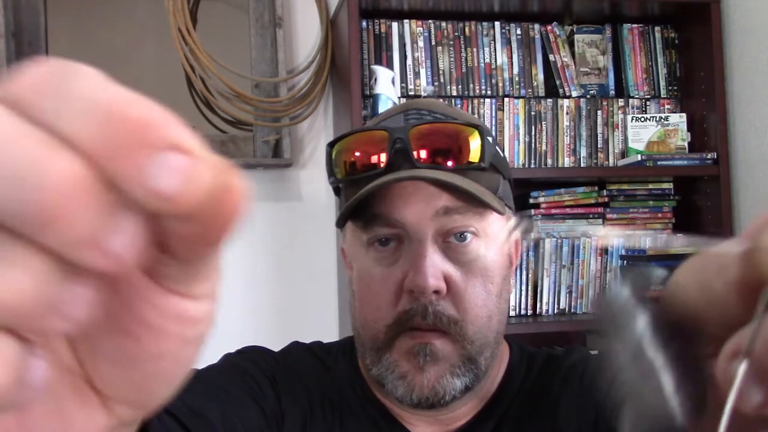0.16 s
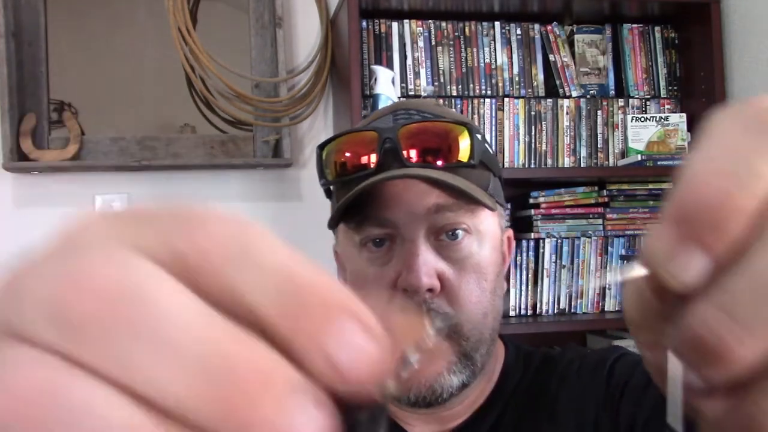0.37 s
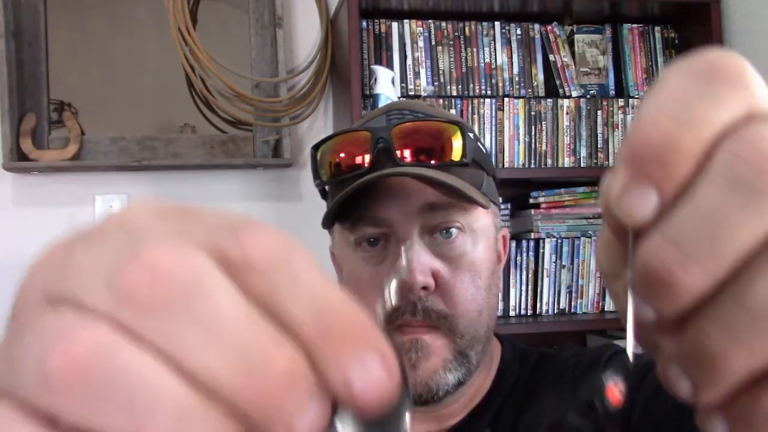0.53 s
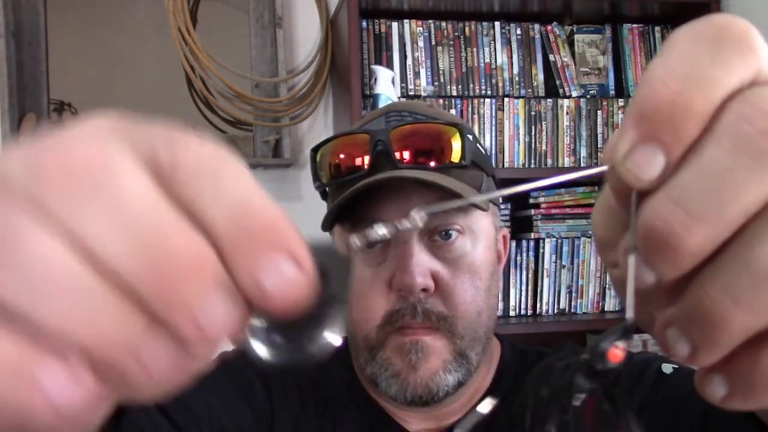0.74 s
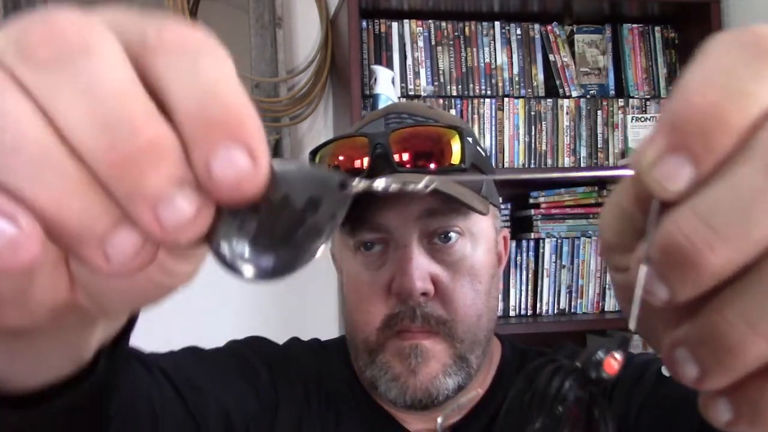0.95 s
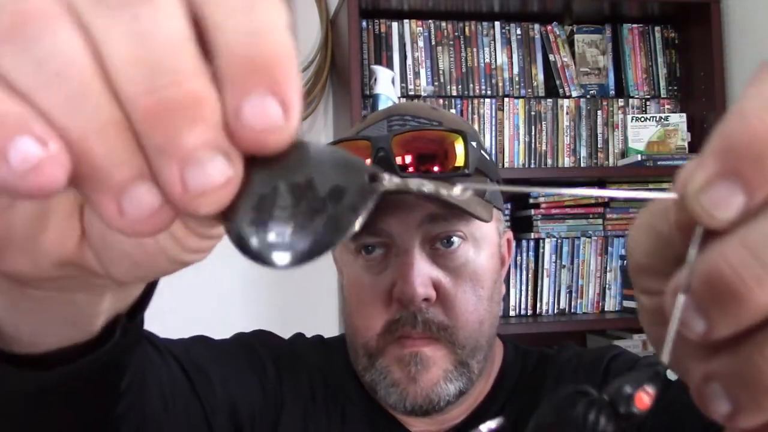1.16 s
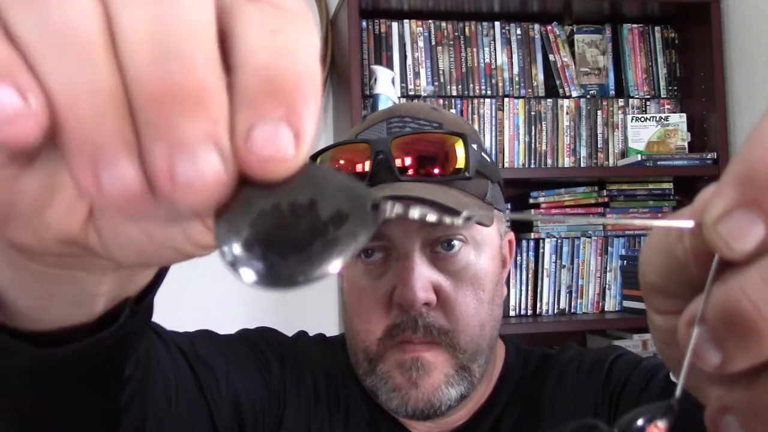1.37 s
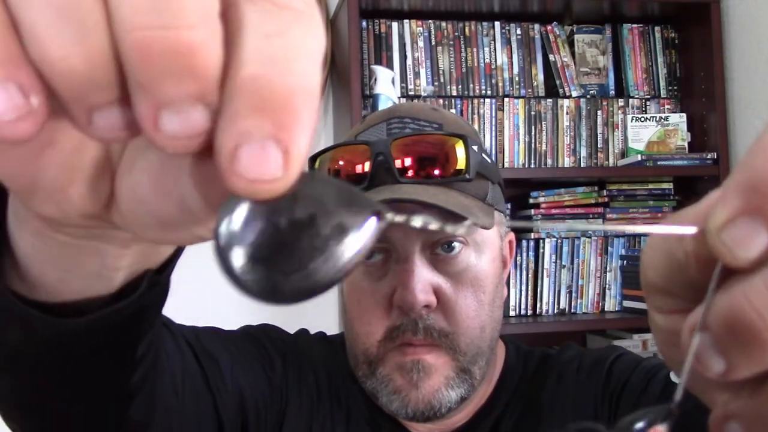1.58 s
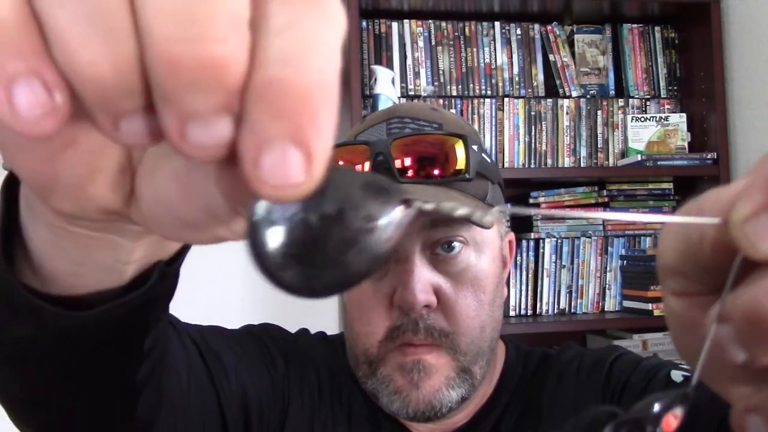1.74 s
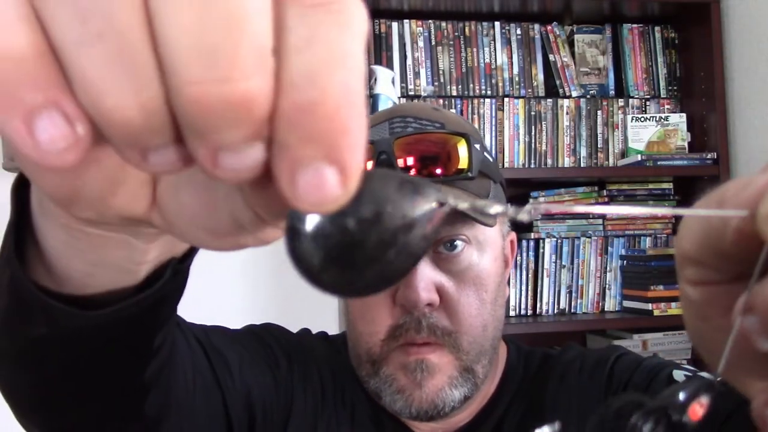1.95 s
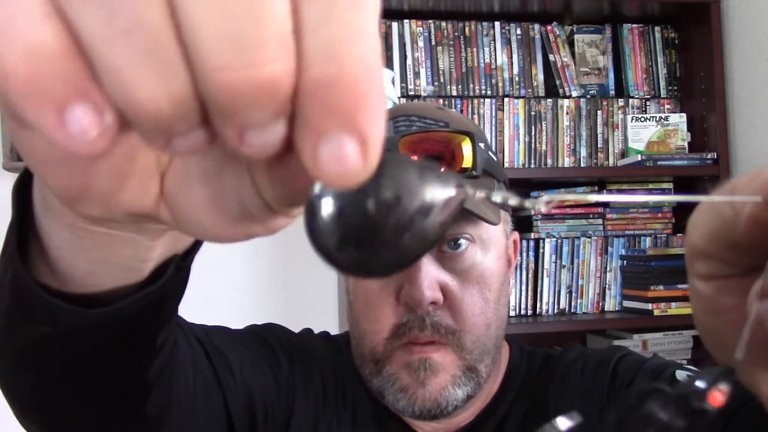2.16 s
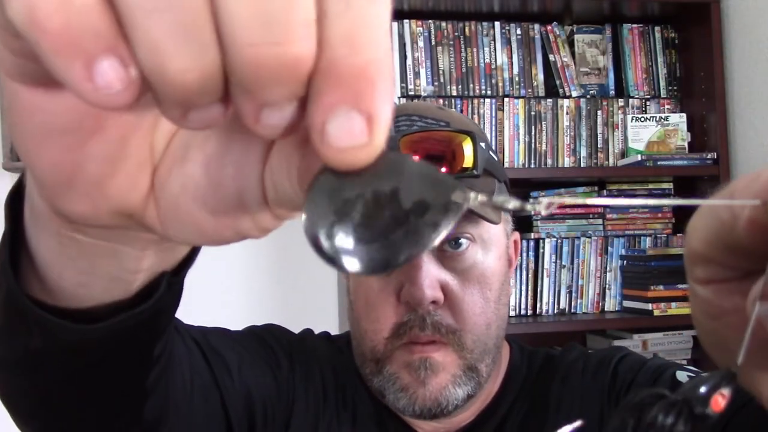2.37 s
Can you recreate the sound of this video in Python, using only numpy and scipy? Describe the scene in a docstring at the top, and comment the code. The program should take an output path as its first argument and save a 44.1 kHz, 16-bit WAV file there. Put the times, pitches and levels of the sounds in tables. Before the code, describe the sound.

Small steel lure blade clinks and rings briefly, followed by tiny ticks and a late sharp snap

```python
"""A quiet room, a steel lure blade close to the microphone and slightly right; fan-like noise and a low hum throughout.
The blade has just clinked as we begin: its modes, a noise crack and a rough haze die away over a soft afterglow.
Small fittings tick against each other, mostly in the first half second, each as a filtered click and a short ring.
Then fingers catch the blade and slide over it in swells of grainy, coloured hiss; a last few ticks fall among and after.
At 2.3 s a wire snaps, one push through seven resonances. Faint wall echoes follow every close sound."""
import sys
import numpy as np
from scipy import signal
from scipy.fft import rfft, irfft, next_fast_len
from scipy.io import wavfile
from scipy.ndimage import map_coordinates

SR = 44100
rng = np.random.default_rng(int(sys.argv[2]) if len(sys.argv) > 2 else 0)


def unload_wav(signal):
    """Save mono or channel-first audio to the path in sys.argv[1] as 16-bit WAV at rate SR, clipped to [-1, 1]."""
    wavfile.write(
        sys.argv[1],
        SR,
        np.round(np.clip(np.atleast_2d(signal).T, -1, 1) * 32767).astype(np.int16),
    )


N = 106501  # samples, about 2.4 s

# Room noise over time: start_s, level_db
AIR_LEVEL = [(0.0, -55.5), (0.89, -56), (1.16, -55), (2.04, -58), (2.41, -56.5)]
# Colour of the room noise: pitch_hz, level_db per Hz (end points are not used)
AIR_COLOUR = [(71, -41.5), (120, -11), (193, -6.5), (237, -6.5), (279, -5.5), (388, -8), (981, -16.5),
              (1160, -18.5), (1510, -17), (1780, -20.5), (4600, -27.5), (14600, -38.5), (16500, -57)]
# Its lowest part: pitch_hz, level_db per Hz
LOW_AIR_COLOUR = [(15, -47), (30, -24), (80, -21), (110, -9)]
# How alike left and right are in the room noise: pitch_hz, likeness (1 = the same)
AIR_LIKENESS = [(60, 1), (130, 0.67), (290, 0.98), (640, 0.69), (1410, 0.79), (3100, 0.7), (6820, 0.92),
                (15000, 0.91)]
# Echo decay by pitch: pitch_hz, t60_s
ROOM_DECAY = [(500, 0.13), (3000, .1), (9000, 0.15), (16000, 0.0693)]
# Resonances of the wire: pitch_hz, width_hz, level_db, direction (signed factor)
WIRE_MODES = [(2570, 1100, 4, 0.92), (3900, 970, -3, -0.91), (5620, 650, -6.5, -1), (7560, 680, -9.5, 1),
              (8740, 110, -1.5, -1.45), (10100, 2300, -2.5, 0.73), (13000, 1500, -10, -0.97)]
# Finger slides: start_s, length_s, peak_share of length, level_db, tilt_db per octave,
# ring_db of the fitting relative to the hiss
SLIDES = [(.418, .032, 0.67, -57, 6, -3.5), (0.449, 0.015, .4, -59, .1, -6),
          (0.577, 0.088, 0.61, -55.5, -1.5, -8), (0.653, 0.16, .2, -71, -8, -1),
          (0.796, .04, .6, -72, .1, 0), (.86, 0.07, .4, -67, 4, -3), (.955, 0.023, .4, -67.5, 8, -14),
          (1.061, 0.046, .2, -64, 10, -10.5), (1.17, 0.046, .4, -78, 4, -17),
          (1.245, .07, .4, -70.5, 5, -2), (1.329, .07, .6, -67, 9, -19), (1.426, .04, .4, -74, 3, -14),
          (1.51, 0.063, .4, -83.5, -2, 7)]
# Colour of skin on metal, before each slide's tilt: pitch_hz, level_db per Hz
SKIN_COLOUR = [(4000, -35), (6000, -8), (7500, 1), (8700, 4), (10500, -1), (12500, -4), (13500, -10),
               (15700, -15), (15950, -60)]
# Touches of the fittings: start_s, ring_db before the onset rise, ring_hz, ring_t60_s,
# click_db (peak before CLICK_BOOST_DB)
TICKS = [(0.08, -36.5, 8970, 0.054, -70), (.1175, -53, 9000, .05, -75), (.1282, -39, 8600, .02, -43),
         (.1335, -56, 8900, .015, -65), (.147, -71, 8950, .025, -75), (.158, -51, 8900, .015, -62),
         (.1635, -47, 8980, 0.046, -70), (.204, -59, 8950, .02, -75), (.229, -58, 8950, .04, -65),
         (.3135, -53, 8810, .02, -56.5), (.4115, -54, 11550, .06, -51), (0.4225, -48, 9200, .012, -44),
         (0.425, -47, 8170, .015, -47), (.4669, -54, 9900, .01, -38.5), (.4812, -64, 7200, .01, -60),
         (.5168, -54, 10100, .01, -56), (0.5613, -50, 7900, .012, -53.5), (1.044, -61, 12500, .015, -66),
         (2.1405, -64.5, 8800, 0.036, -75)]
# Resonances of a tick's click: pitch_hz, width_hz, level_db
CLICK_MODES = [(7500, 1800, 2.5), (9840, 2000, 3), (13000, 2200, -10)]
# Blade modes: pitch_hz, direction at the struck point (+1 or -1)
BLADE_PITCHES = [(4727, 1), (7964, 1), (8955, 1), (9445, 1), (11511, 1), (11720, 1), (11861, -1),
                 (14980, 1), (15587, 1)]
# The same modes, in order: level_db, t60_s, afterglow_db, afterglow_t60_s
BLADE_DECAYS = [(-43.5, 0.053, -66, 0.29), (-14.5, 0.25, -51, .35), (-16.5, .027, -52, .3),
                (-49.5, 0.1, -65, .2), (-13.5, .085, -47.5, 0.4), (-11, 0.086, -43, .45),
                (-26, 0.19, -46, .45), (-16.5, 0.028, -58, .4), (-47, .1, -51, .25)]
# Colour of the haze between the modes: pitch_hz, level_db
HAZE_COLOUR = [(6500, -26), (8200, -3), (11500, 0), (13500, -15), (15200, -5.5), (15900, -41.5)]

AIR_TOP_HZ = 15800
HUM_HZ, HUM_DB, HUM_WAVER_HZ, HUM_WAVER_DB = 101.3, -65.5, .8, 1
ECHO_DB, ECHO_GAP_S, ECHO_LIKENESS = -18, .0015, .75
LURE_LEAN_DB, AIR_LEAN_DB = -.33, .33  # added on the left, taken off on the right
SNAP_S, SNAP_DB = 2.3123, -17
WIRE_LOW_HZ, WIRE_TOP_HZ, WIRE_SHELF_DB = 1550, 13900, -9
SLIDE_EDGE_S, SLIDE_HUMP_DB, SLIDE_GRAIN_DB = .015, 8, 1.5
FITTING_HZ, FITTING_WIDTH_HZ = 8700, 250
RING_RISE_S, CLICK_BOOST_DB = .00053, 5.5
BLOW_S = -.0015  # the blow falls just before the start
CRACK_DB, CRACK_T60_S = -10, .012
HAZE_DB, HAZE_T60_S = -43, .22
AFTERGLOW_WIDTH_HZ = 30
SWELL_S, SWELL_HZ, SWELL_DB, SWELL_WIDTH_S = .055, 4680, -56, .022


def amp(db):
    """Decibels to gain."""
    return 10 ** (np.asarray(db) / 20)


def unit(x):
    """Scaled to rms 1."""
    return x / np.sqrt(np.mean(x ** 2) + 1e-20)


def along(points, hz):
    """Values between (pitch_hz, value) points on a log pitch axis."""
    pitch, value = np.transpose(points)
    return np.interp(np.log(hz + 1), np.log(pitch + 1), value)


def wobble(rate_hz):
    """A smooth random curve through rate_hz random knots a second."""
    knots = rng.standard_normal(int(N * rate_hz / SR) + 4)
    return map_coordinates(knots, [np.arange(N) * rate_hz / SR])


def filtered(x, response):
    """A sound shaped by a complex response of frequency."""
    size = next_fast_len(N + SR // 2)
    hz = np.fft.rfftfreq(size, 1 / SR)
    return irfft(rfft(x, size) * response(hz), size)[..., :N]


def noise(colour):
    """Coloured noise of rms 1."""
    return unit(filtered(rng.standard_normal(N), lambda hz: amp(along(colour, hz))))


def peak(f, hz, width_hz):
    """The response of one resonance, 1 at its centre."""
    return 1j * f * width_hz / (hz * hz - f * f + 1j * f * width_hz)


def narrow(hz, width_hz):
    """Noise around one pitch, through the same resonance twice, rms 1."""
    return unit(filtered(rng.standard_normal(N), lambda f: peak(f, hz, width_hz) ** 2))


def dying(start_s, t60_s):
    """Time since the start, and a decay of 60 dB per t60 from there."""
    t = np.maximum(np.arange(N) / SR - start_s, 0)
    return t, (t > 0) * amp(-60 * t / t60_s)


def pushed(times_s, levels_db, response):
    """Sharp pushes through a response, each scaled to its peak level."""
    trial, pushes = np.zeros(N), np.zeros(N)
    trial[99] = 1  # a lone push, to find the peak of the response
    pushes[np.round(np.array(times_s) * SR).astype(int)] = amp(levels_db)
    return filtered(pushes, response) / np.abs(filtered(trial, response)).max()


def air():
    """Fan-like room noise, partly different left and right, over a slightly wavering hum."""
    colour = LOW_AIR_COLOUR + AIR_COLOUR[1:-1] + [(15800, -45.5)]
    likeness = [(30, .45)] + AIR_LIKENESS

    def mid_side(hz):
        # the angle splits the power so that left and right correlate by the likeness
        angle = np.arccos(np.clip(along(likeness, hz), -1, 1)) / 2
        level = (hz < AIR_TOP_HZ) * amp(along(colour, hz))
        return level * [np.cos(angle), np.sin(angle)]

    mid, side = filtered(rng.standard_normal((2, N)), mid_side)
    start_s, level_db = np.transpose(AIR_LEVEL)
    level = amp(np.interp(np.arange(N) / SR, start_s, level_db))
    rush = level * unit(np.array([mid + side, mid - side]))
    hum_hz = HUM_HZ + HUM_WAVER_HZ * wobble(4.8)
    hum = np.sin(2 * np.pi * np.cumsum(hum_hz) / SR)
    hum_level = amp(HUM_DB + HUM_WAVER_DB * wobble(8))
    return amp([[AIR_LEAN_DB], [-AIR_LEAN_DB]]) * rush + hum_level * hum


def room(close):
    """The walls answer with decaying noise, each pitch at its own rate; the highest treble dies first."""
    hz, t, bins = signal.stft(rng.standard_normal((2, SR // 2)), SR, nperseg=256)
    fall = amp(-60 * t / along(ROOM_DECAY, hz)[:, None])
    mid, side = signal.istft(bins * fall, SR, nperseg=256)[1]
    width = np.sqrt((1 - ECHO_LIKENESS) / (1 + ECHO_LIKENESS))
    tail = np.array([mid + width * side, mid - width * side]) / np.linalg.norm(mid)
    late = np.pad(close, (round(ECHO_GAP_S * SR), 0))
    return signal.fftconvolve(late[None], tail, axes=1)[:, :N]


def snap():
    """One sharp push through the resonances of the wire, weak below and above its band."""
    def response(f):
        low_edge = (1j * f / (WIRE_LOW_HZ + 1j * f)) ** 2
        top_edge = amp(WIRE_SHELF_DB) + 1 / (1 + (f / WIRE_TOP_HZ) ** 20)
        modes = sum(way * amp(db) * peak(f, hz, width) for hz, width, db, way in WIRE_MODES)
        return low_edge * top_edge * modes

    return pushed([SNAP_S], [SNAP_DB], response)


def fingers():
    """Grainy friction hiss swells and fades under each slide; it also shakes a fitting."""
    t, out = np.arange(N) / SR, np.zeros(N)
    for start, length, share, db, tilt_db, ring_db in SLIDES:
        end = start + length
        hump_db = np.interp(t, [start, start + share * length, end], [-SLIDE_HUMP_DB, 0, -SLIDE_HUMP_DB])
        # soft edges, reaching half an edge beyond the start and end
        edges = np.clip(np.minimum(t - start, end - t) / SLIDE_EDGE_S + .5, 0, 1) ** 2
        hiss = noise([(hz, level + tilt_db * np.log2(hz / FITTING_HZ)) for hz, level in SKIN_COLOUR])
        ringing = amp(ring_db) * narrow(FITTING_HZ, FITTING_WIDTH_HZ)
        out += amp(db + hump_db) * edges * (hiss + ringing)
    return amp(SLIDE_GRAIN_DB * wobble(400)) * out


def fittings():
    """Each touch of the small fittings is a bright click and one short ring."""
    def click(f):
        # neighbouring resonances alternate in sign
        return sum((-1) ** k * amp(db) * peak(f, hz, width) ** 2
                   for k, (hz, width, db) in enumerate(CLICK_MODES))

    start_s, *_, click_db = np.transpose(TICKS)
    out = pushed(start_s, click_db + CLICK_BOOST_DB, click)
    for start, ring_db, hz, t60, _ in TICKS:
        t, fall = dying(start, t60)
        rise = 1 - np.exp(-t / RING_RISE_S)
        out += amp(ring_db) * rise * fall * np.sin(2 * np.pi * hz * t)
    return out


def blade():
    """One blow rings every mode; noise gives the crack, the haze and a rough afterglow as the blade spins."""
    crack_colour = [(100, -23.5), (1200, -9), (4000, -12), (8000, -3.5), (16000, -4)]  # pitch_hz, level_db
    out = amp(CRACK_DB) * dying(BLOW_S, CRACK_T60_S)[1] * noise(crack_colour)
    out += amp(HAZE_DB) * dying(BLOW_S, HAZE_T60_S)[1] * noise(HAZE_COLOUR)
    for (hz, way), (db, t60, after_db, after_t60) in zip(BLADE_PITCHES, BLADE_DECAYS):
        t, fall = dying(BLOW_S, t60)
        out += way * amp(db) * fall * np.sin(2 * np.pi * hz * t)
        after_fall = dying(BLOW_S, after_t60)[1]
        out += amp(after_db) * after_fall * narrow(hz, AFTERGLOW_WIDTH_HZ)
    # a low mode swells briefly as the blade turns
    t = np.arange(N) / SR
    swell = np.exp(-((t - SWELL_S) / SWELL_WIDTH_S) ** 2)
    return out + amp(SWELL_DB) * swell * np.sin(2 * np.pi * SWELL_HZ * t)


def scene():
    """The room noise, the lure close by and its echo off the walls."""
    lure = snap() + fingers() + fittings() + blade()
    direct = lure * amp([[LURE_LEAN_DB], [-LURE_LEAN_DB]])
    return air() + direct + amp(ECHO_DB) * room(lure)


def record(dry):
    """The microphone's band limit: full up to 16 kHz, nothing above 17 kHz."""
    return filtered(dry, lambda hz: np.clip((17000 - hz) / 1000, 0, 1) ** 3)


dry = scene()
out = record(dry)
unload_wav(out)
```